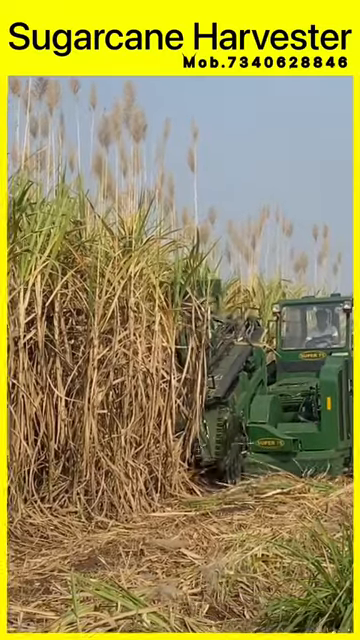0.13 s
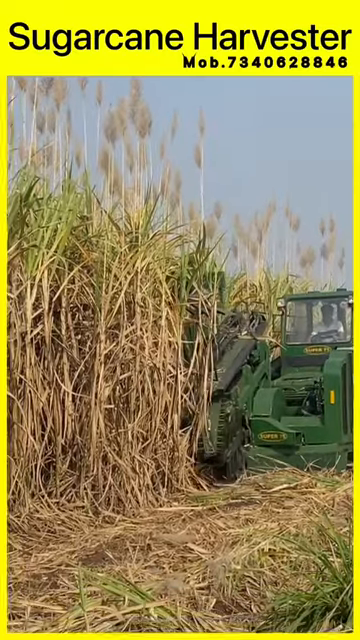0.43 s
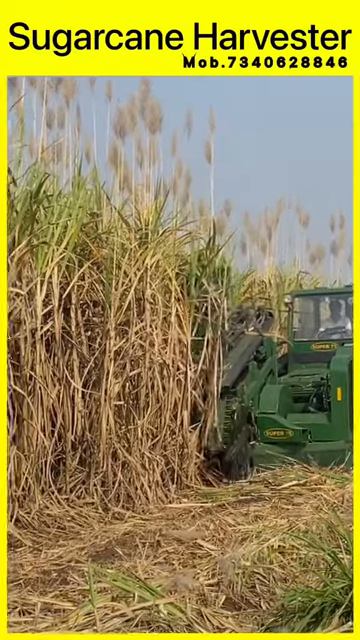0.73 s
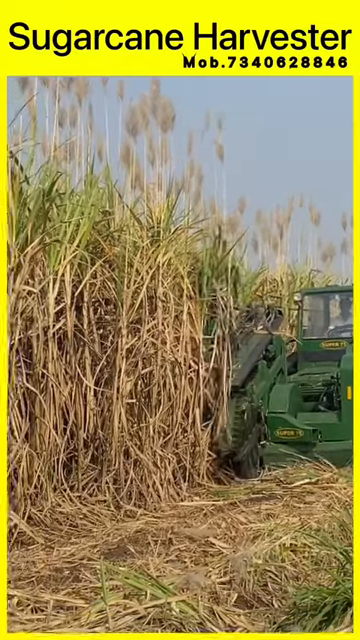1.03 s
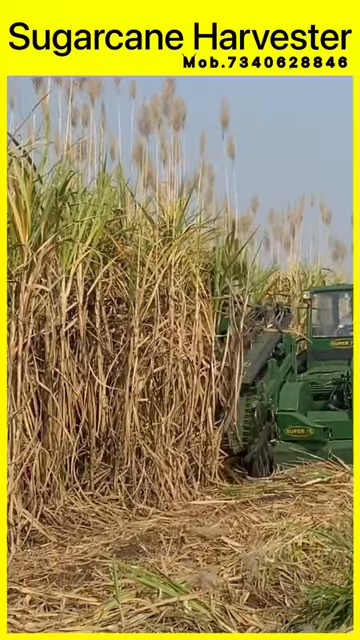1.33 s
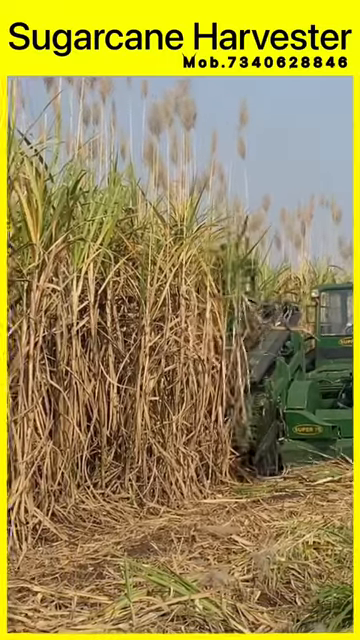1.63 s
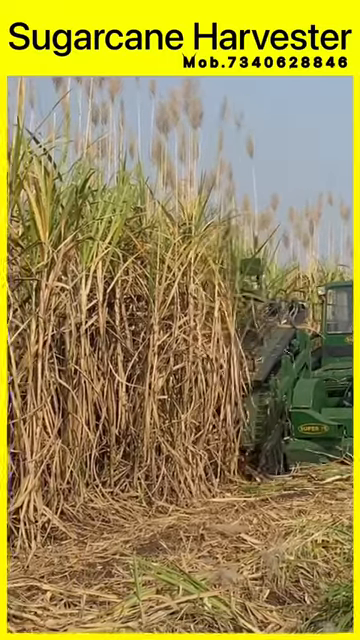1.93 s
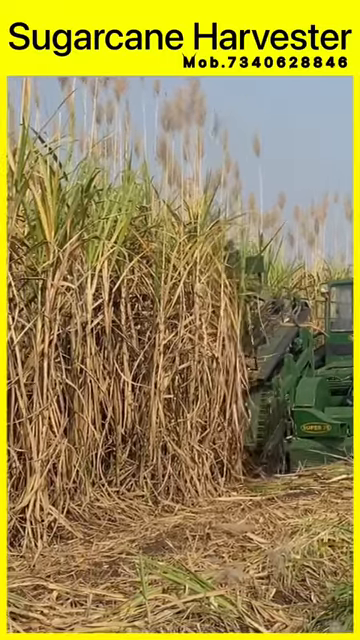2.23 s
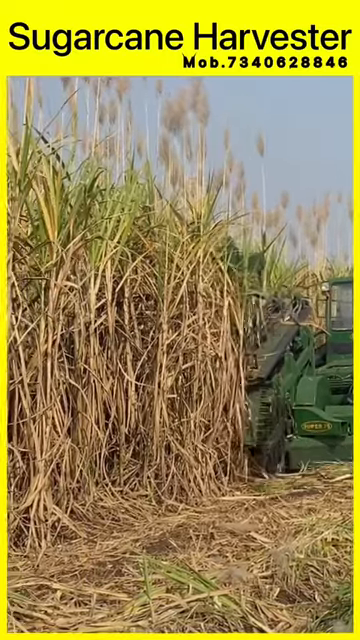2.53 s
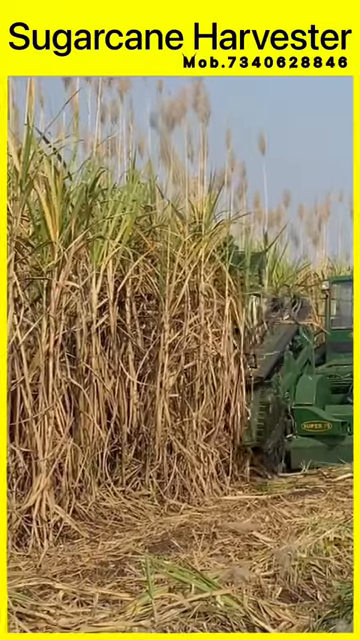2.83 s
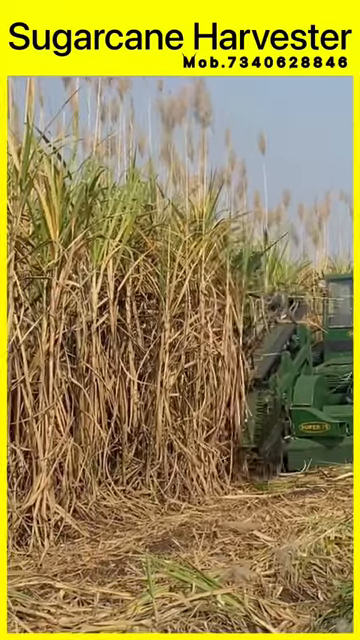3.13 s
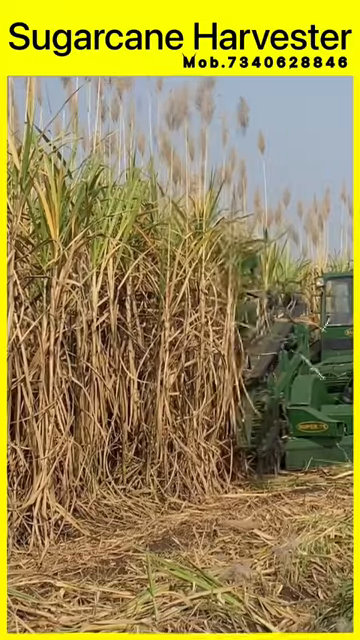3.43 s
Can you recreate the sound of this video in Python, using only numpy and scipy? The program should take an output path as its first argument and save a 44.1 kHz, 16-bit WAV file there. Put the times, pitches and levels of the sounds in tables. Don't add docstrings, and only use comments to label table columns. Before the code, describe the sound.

Steady diesel drone of a cane harvesting machine, with rustling, snapping stalks growing denser

```python
import sys
import numpy as np
from scipy import signal
from scipy.fft import rfft, irfft
from scipy.io import wavfile
from scipy.ndimage import uniform_filter1d

SR = 44100
rng = np.random.default_rng(int(sys.argv[2]) if len(sys.argv) > 2 else 0)


def to_linear_factor(level_db):
    exponent = np.asarray(level_db, float) / 20
    return 10 ** exponent


def bounce(signal):
    frames = np.transpose(np.atleast_2d(signal))
    limited = np.clip(frames, -1, 1)
    pcm = np.round(limited * 32767).astype(np.int16)
    wavfile.write(sys.argv[1], SR, pcm)


N = 157437


def evened(x):
    return x / np.sqrt(np.mean(x ** 2) + 1e-20)


def read(points, hz):
    f, value = np.transpose(points)
    return np.interp(np.log(hz + 1), np.log(f + 1), value)


def curve(rows, axis=1):
    rows = np.array(rows)
    return np.interp(np.arange(N) / SR, rows[:, 0], rows[:, axis])


def colour(x, points):
    return irfft(rfft(x) * to_linear_factor(read(points, np.fft.rfftfreq(N, 1 / SR))), N)


def tone(hz):
    return np.sin(2 * np.pi * np.cumsum(hz) / SR)


def drift(top_hz):
    t = np.arange(0, N + 128, 128) / SR
    f = np.geomspace(.04, 1, num=24)[:, None] * top_hz
    waves = np.sin(2 * np.pi * (f * t + rng.random((24, 1)))) / f ** 0.218
    return np.interp(np.arange(N) / SR, t, evened(waves.sum(0)))


def patchy(points, patchy_db, flicker_db, size=512):
    frames, hz = 4 * N // size + 5, np.fft.rfftfreq(size, 1 / SR)
    a, b, patches = rng.standard_normal((frames, len(hz), 3)).T
    patches = uniform_filter1d(patches, size=9, axis=0)
    patches = evened(uniform_filter1d(patches, size=12, axis=1))
    flicker = evened(uniform_filter1d(rng.standard_normal(frames), size=5))
    level_db = read(points, hz)[:, None] + patchy_db * patches + flicker_db * flicker
    z = (a + 1j * b) * to_linear_factor(level_db)
    return evened(signal.istft(z, nperseg=size, noverlap=3 * size // 4)[1][:N])


# time_s, firing_hz, load_db
ENGINE = [(0, 84.2, -39), (.35, 83.8, -38), (.55, 83.85, -35), (.8, 83.84, -35.5), (1.1, 83.76, -36),
          (1.3, 83.75, -37.5), (1.45, 83.8, -36), (1.55, 83.84, -36), (1.85, 83.65, -33),
          (2.15, 83.8, -34.5), (2.4, 83.7, -34), (2.65, 83.53, -31.5), (2.85, 83.4, -33.5),
          (2.95, 83.6, -35), (3.05, 83.76, -33), (3.3, 83.73, -36), (3.57, 83.76, -33.5)]


def engine():
    firings = np.cumsum(curve(ENGINE)) / SR
    return firings, curve(ENGINE, axis=2) + 34.5


# multiple of firing rate, level_db, share of load followed, wobble_db
EXHAUST = [(.5, -44.5, .3, 2.5), (1, -34.5, 1.0, .3), (1.167, -55, .3, 3.0), (1.5, -41.8, .3, .8),
           (1.667, -59, .3, 2.0), (3, -60, .3, 3)]


def exhaust():
    firings, load_db = engine()
    out = np.zeros(N)
    for order, level_db, load_share, wobble_db in EXHAUST:
        gain = to_linear_factor(level_db + load_share * load_db + wobble_db * drift(9))
        out += gain * np.sign(order - 3 / 4) * np.sin(2 * np.pi * order * firings)
    return np.sqrt(2) * out


# pitch_hz, level_db (per Hz)
RUMBLE = [(26, -45), (36, -20), (52, 14), (75, 10.5), (110, 6), (170, 8.5), (260, 1), (400, -30)]
# pitch_hz, level_db (per Hz)
ROAR = [(250, -2), (450, -4), (900, -1.5), (1300, -4.5), (1900, -7), (2150, -7.5), (2500, -13.5),
        (3200, -43)]


def roar():
    firings, load_db = engine()
    rumble_db = -42.5 + 0.33 * load_db + 1.0 * drift(2.95)
    rumble = to_linear_factor(rumble_db) * evened(colour(rng.standard_normal(N), RUMBLE))
    fan = to_linear_factor(-39.5) * patchy(ROAR, patchy_db=1.07, flicker_db=-0.1)
    body = fan + to_linear_factor(-2.5) * panels()
    puffs = 1 + .04 * np.cos(2 * np.pi * firings)
    return rumble + body * to_linear_factor(.2 * load_db) * puffs


def resonate(x, hz, width):
    b, a = signal.iirpeak(hz, hz / width, SR)
    return signal.lfilter(b, a, signal.lfilter(b, a, x))


# pitch_hz, width_hz, level_db
HOUSING = [(561.6, 34, -53.5), (643, 43, -49), (693.4, 45, -49.5), (754, 60, -50.5), (1048, 27, -55),
           (1152.5, 44, -53.5), (1249, 60, -53.5), (1432, 31, -59), (1602, 46, -53), (1794, 73, -57.5),
           (2122, 88, -55), (2700, 88, -58), (3573, 44, -64)]


def panels():
    knocks_per_s, knock_share = 40, 0.41
    out = np.zeros(N)
    for hz, width_hz, level_db in HOUSING:
        knocks = evened((rng.random(N) < knocks_per_s / SR) * rng.standard_normal(N))
        shaking = rng.standard_normal(N) + knock_share * knocks
        out += to_linear_factor(level_db + 0.86 * drift(12)) * evened(resonate(shaking, hz, width_hz))
    return out


# pitch_hz, level_db, wander_hz, wobble_db
TONES = [(152.4, -57, 6, 3), (189, -55, 4, 2.5), (212, -57, 6, 2.5), (255, -58, 8, 2.5),
         (321.5, -55, 1.5, 1), (358.3, -64, 1.5, 3)]
# time_s, pitch_hz, level_db
CUTTER = [(.12, 167, -66), (.28, 165.5, -49), (.5, 166.1, -40.5), (.78, 167.3, -49), (1.02, 165.7, -43.5),
          (1.22, 167.5, -37.5), (1.42, 166.4, -52), (1.62, 166.1, -45.5), (2.0, 168.3, -41),
          (2.2, 166.9, -51), (2.4, 165.7, -40.5), (2.58, 165.2, -41.5), (2.68, 167.2, -51),
          (2.82, 166.5, -41.5), (3.02, 167.3, -44), (3.15, 167.3, -44.5), (3.5, 167, -44.5)]


def tones():
    out = to_linear_factor(curve(CUTTER, axis=2) + 1.9 * drift(25)) * tone(curve(CUTTER))
    for hz, level_db, wander_hz, wobble_db in TONES:
        out += to_linear_factor(level_db + wobble_db * drift(6)) * tone(hz + wander_hz * drift(4))
    return np.sqrt(2) * out


# time_s, level_db
FEED = [(0.0, -52.5), (0.21, -55.5), (0.5, -52), (0.52, -53), (1.18, -52.5), (1.22, -56), (1.26, -53.5),
        (1.51, -55), (2.2, -52.5), (2.4, -49.5), (2.55, -50.5), (2.88, -48.5), (2.91, -44.5), (2.94, -48.5),
        (2.99, -45.5), (3.01, -48.5), (3.41, -47), (3.57, -49.5)]


def feed():
    return curve(FEED) + 50.5


# pitch_hz, level_db (per Hz)
RUSTLE = [(1500, -3), (2500, -2), (3300, 3.5), (4500, -4.5), (6200, -3), (9500, -9), (11200, -9.5),
          (15500, -18)]


def cane():
    chops_per_s, crackles_per_s = 21, 900
    feed_db = feed() + 1.2 * np.cos(2 * np.pi * np.cumsum(chops_per_s + 1.51 * drift(3.4)) / SR)
    rustle = to_linear_factor(-46) * patchy(RUSTLE, patchy_db=-0.77, flicker_db=0.1, size=256)
    clumps = to_linear_factor(5.0 * drift(30))
    strength = to_linear_factor(2.8 * np.minimum(rng.exponential(1, N), 4))
    hits = (rng.random(N) < crackles_per_s / SR * clumps) * strength
    kind, t, crackle = rng.integers(0, 24, N), np.arange(200) / SR, np.zeros(N)
    for k, hz in enumerate(np.geomspace(2800, 15000, num=24)):
        grain = np.sin(2 * np.pi * hz * t) * t * hz * np.exp(-t * hz / 1.85)
        grain *= to_linear_factor(read(RUSTLE, hz)) * hz
        crackle += signal.oaconvolve(hits * (kind == k), grain)[:N]
    return to_linear_factor(feed_db) * (rustle + to_linear_factor(-55.5) * evened(crackle))


# start_s, peak_db, tilt_db (per octave), splinter_s
SNAPS = [(0.0752, -35, 1, 0.014), (0.106, -36, 1, 0.017), (0.1794, -38, -1, 0.013), (0.3016, -35, 0, 0.013),
         (0.3337, -34, -5, 0.013), (0.4363, -42, -6, 0.013), (0.4794, -35, 6, 0.014),
         (0.503, -38, 8, 0.013), (0.6432, -30, -9, 0.018), (0.6791, -36, 10, 0.013),
         (0.7993, -40, -6, 0.01), (0.8879, -37, 1, 0.013), (0.967, -37, 5, 0.006),
         (1.0014, -32.5, 1, 0.014), (1.0909, -28, 15, 0.0087), (1.2857, -33, 0, 0.011),
         (1.7374, -34, -4, 0.017), (1.8799, -39, 5, 0.013), (2.1186, -29, -6.5, 0.013),
         (2.429, -27, -12, 0.014), (2.4556, -34, -17, 0.012), (2.6464, -28.5, -4, 0.012),
         (2.6834, -31, 2, 0.018), (2.8968, -28.5, -7, 0.013), (2.9814, -24.5, -2.5, 0.02),
         (3.074, -28, -4.5, 0.015), (3.1248, -28.5, -4, 0.012), (3.251, -42, 6, 0.013),
         (3.2815, -31, 4, 0.012), (3.4119, -31, 4, 0.013), (3.4394, -27, -10, 0.014),
         (3.5541, -28.5, -1.5, 0.012)]
# pitch_hz, level_db (per Hz)
CRACK = [(800, -18.5), (1800, 5), (3500, -1), (6000, -2), (11000, -6), (15500, -20.5)]


def snaps():
    rise_s, crack_s = 0.003, 0.004
    out, t = np.zeros(N + 4096), np.arange(4096) / SR
    hz = np.fft.rfftfreq(4096, 1 / SR)
    for start_s, peak_db, tilt_db, splinter_s in SNAPS:
        noise, chance = rng.standard_normal(4096), rng.random(4096)
        splinters = uniform_filter1d(1. * (chance < 600 / SR), size=40) * 40
        spectrum_db = read(CRACK, hz) + tilt_db * np.log2(hz / 6000 + 0.11)
        burst = irfft(rfft(noise) * to_linear_factor(spectrum_db))
        crack = .7 * np.exp(-t / crack_s)
        splintering = (0.58 + .25 * splinters) * np.exp(-(t / splinter_s) ** 2)
        shape = np.minimum(t / rise_s, 1) * (crack + splintering)
        out[round(start_s * SR):][:4096] += to_linear_factor(peak_db - 9.5) * shape * evened(burst)
    return out[:N]


# start_s, length_s, from_hz, to_hz, level_db
SQUEAK = (2.912, .066, 620, 1000, -37.5)


def squeak():
    start_s, length_s, from_hz, to_hz, level_db = SQUEAK
    u = np.clip((np.arange(N) / SR - start_s) / length_s, 0, 1)
    gain = to_linear_factor(level_db + 2.2 * drift(150)) * np.sin(np.pi * u) ** .6
    return gain * tone(from_hz + (to_hz - from_hz) * u)


# pitch_hz, level_db (per Hz)
LEAVES = [(4000, -25), (7000, -5), (9500, -5), (11200, 0), (13000, -3), (15500, -8)]


def leaves():
    sweep_db = 1.2 * feed() + 3.5 * drift(25)
    return to_linear_factor(-59 + sweep_db) * patchy(LEAVES, patchy_db=4.0, flicker_db=1.5, size=256)


# peak_s, length_s, level_db
GUSTS = [
    (.4, 0.078, -48),
    (0.698, 0.14, -42),
    (0.954, .08, -47),
    (1.63, .07, -41),
    (1.798, 0.069, -51),
    (1.998, 0.12, -44),
    (2.95, .05, -43),
    (3.3, .1, -54),
]
# pitch_hz, level_db (per Hz)
GUST = [(30, -45), (45, -8), (62, 7), (75, 2), (130, -10), (250, -44.5)]


def breeze():
    t = np.arange(N) / SR
    a, b = (evened(colour(rng.standard_normal(N), GUST)) for port in range(2))
    puffs = sum(to_linear_factor(level_db) * np.exp(-((t - peak_s) / length_s) ** 2)
                for peak_s, length_s, level_db in GUSTS)
    return puffs * np.array([a + 0.45 * b, a - 0.33 * b])


# pitch_hz, level_db
FIELD = [(25, -22), (40, -16), (300, -22), (2200, -21), (2900, -22), (3600, -24), (4200, -45), (7000, -80)]


def scene():
    hz = np.fft.rfftfreq(N, 1 / SR)
    hum = exhaust() + tones()
    noise = roar() + cane() + leaves() + snaps() + squeak()
    notch_db = -5.5 / (1 + ((hz - 2464) / 47) ** 2)
    noise = irfft(rfft(noise) * to_linear_factor(notch_db), N)
    spread = colour(np.roll(noise, 9000) - np.roll(noise, 23000), FIELD)
    return np.array([hum + noise + spread, hum + noise - spread]) + breeze()


def roll_off(x):
    return signal.sosfilt(signal.butter(12, 16900, fs=SR, output="sos"), x)


# pitch_hz, level_db
SIDE_DB = [(40, 0.5), (130, -2.5), (330, -1), (550, -3), (770, -0.5), (1150, -3), (1800, -2), (2500, 0)]


def record(dry):
    hz = np.fft.rfftfreq(N, 1 / SR)
    twist = 2 * np.pi * np.maximum(hz - 6950, 0) / 4190
    phase = twist - .3 * np.sin(2 * twist)
    left = to_linear_factor(read(SIDE_DB, hz) / 2) * np.exp(-.5j * phase)
    ports = irfft(rfft(dry) * np.array([left, 1 / left]) * (hz < 15760), N)
    return roll_off(ports)


dry = scene()
out = record(dry)
bounce(out)
```